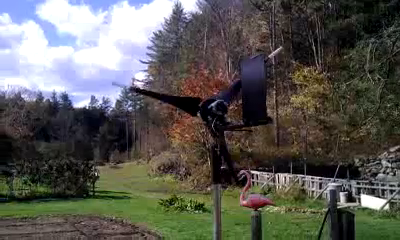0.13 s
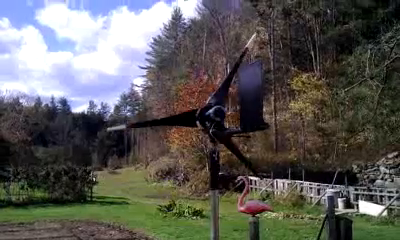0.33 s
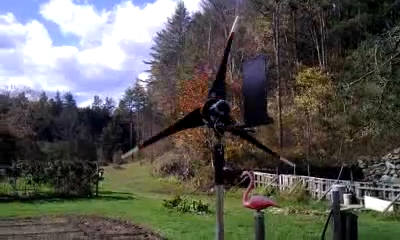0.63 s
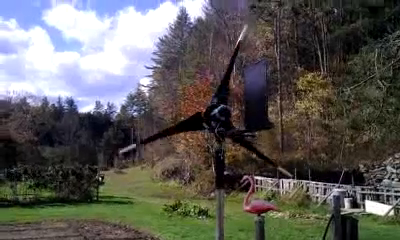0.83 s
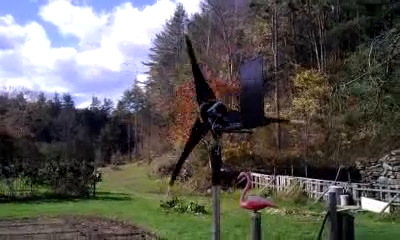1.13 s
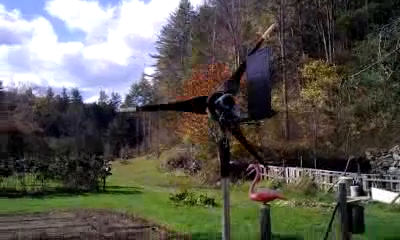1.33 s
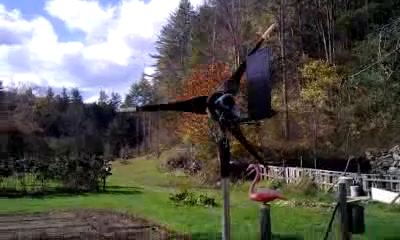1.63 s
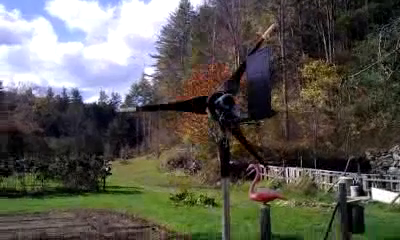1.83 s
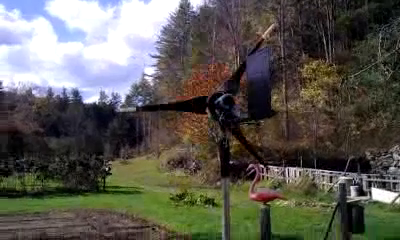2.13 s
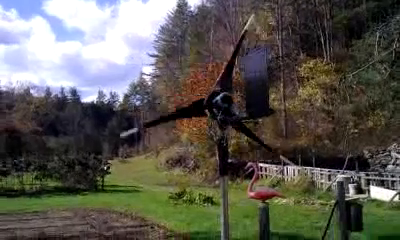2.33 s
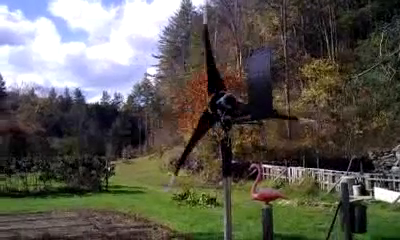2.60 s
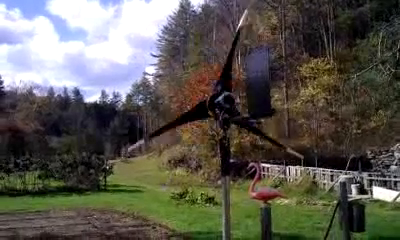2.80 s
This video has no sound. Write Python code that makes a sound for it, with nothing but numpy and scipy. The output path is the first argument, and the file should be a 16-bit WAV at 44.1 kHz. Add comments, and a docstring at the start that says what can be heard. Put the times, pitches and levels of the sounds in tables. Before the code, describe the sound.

Gusty wind buffets and overloads a small outdoor microphone, with faint hiss from spinning turbine blades

```python
"""After a moment of silence a faint hiss starts, and gusty wind at once buffets a small microphone in a yard.
The hiss is air round a little wind turbine's blades: a broad rush plus a high hiss, both shaped noise.
The wind is noise from large swirls and small eddies that follows the gusts, plus short sharp buffets.
Strong wind drives the microphone capsule to its limit, so the rumble flattens and rasps.
The blade hiss is choked whenever that happens."""
import sys
import numpy as np
from scipy import signal
from scipy.fft import rfft, irfft, next_fast_len
from scipy.io import wavfile
from scipy.ndimage import uniform_filter1d, map_coordinates

SR = 44100
rng = np.random.default_rng(int(sys.argv[2]) if len(sys.argv) > 2 else 0)


def wav_out(sig):
    """Save sig, one row per channel (or a flat mono array), as 16-bit PCM at SR to the path in sys.argv[1]."""
    wavfile.write(sys.argv[1], SR, np.round(np.clip(np.atleast_2d(sig).T, -1, 1) * 32767).astype(np.int16))


N = 130536
TIME = np.arange(N) / SR  # seconds

# Loudness of the blade sound, before BLADE_DB and the random drops: t/s, level/dB
HISS_LEVEL = [(0.06, -55.5), (0.09, -51), (0.28, -65.5), (0.33, -61), (0.35, -69.5), (0.45, -59.5),
              (0.5, -69.5), (0.54, -60.5), (0.57, -71.5), (0.6, -58.5), (1.0, -65), (1.3, -61), (1.33, -65),
              (1.44, -60.5), (1.53, -63), (1.73, -58), (1.77, -68), (1.92, -60), (1.99, -68.5), (2.36, -63),
              (2.39, -70), (2.51, -61.5), (2.6, -64.5), (2.76, -57.5), (2.84, -65.5), (2.95, -62)]
# Colour of the broad rush of air round the rotor: f/Hz, level/dB (per Hz)
RUSH_COLOUR = [(100, -1.5), (500, -7.5), (1000, 3), (1800, 1.5), (2700, -7), (4500, -5), (7000, -9.5),
               (10000, -31.5)]
# Colour of the high hiss off the blades: f/Hz, level/dB (per Hz)
BLADE_COLOUR = [(1500, -27.5), (3500, -8), (4700, -10.5), (6200, -3.5), (7500, 0), (8500, -4.5),
                (9700, -11), (10400, -31)]
# Gusts, with strength before GUST_GROWS: t/s, strength/dB, weight of the small eddies/dB
GUST_STRENGTH = [(0.09, -35.5, -11), (0.14, -36, -11.5), (0.22, -36.5, -14.5), (0.39, -33.0, -5),
                 (0.43, -36.5, -11), (0.552, -34.5, -11), (0.579, -44.5, -9), (0.61, -33, -14),
                 (0.701, -37, -11.5), (0.83, -32.5, -11), (0.921, -37.5, -4), (1.01, -29.0, -8.5),
                 (1.08, -34.0, -8.0), (1.21, -30, -8.5), (1.256, -28.0, -12.5), (1.29, -37.0, -2.5),
                 (1.39, -27, -8), (1.45, -35.5, -5.5), (1.6, -31, -8), (1.66, -28.5, -6.5),
                 (1.71, -27.0, -5.5), (1.769, -34.5, -5), (1.86, -28.5, -5), (1.93, -32, -5.5),
                 (2.02, -37.5, -0.5), (2.085, -30, -7.5), (2.115, -42, -4), (2.2, -29, -9.5),
                 (2.28, -30.5, -3.5), (2.368, -35.5, -6.5), (2.52, -30, -4), (2.651, -31.0, -7.5),
                 (2.73, -29, -7), (2.789, -26.5, -9.5), (2.85, -36.5, -5.5), (2.91, -29, -4.5),
                 (2.95, -28.5, -12)]
# Colour of the large swirls: f/Hz, level/dB (per Hz)
SWIRL_COLOUR = [(15, -6.5), (30, 1.5), (60, 2.5), (110, 3), (165, 4), (300, -5.5), (450, -24.5),
                (800, -35.5), (2000, -72)]
# Colour of the small eddies: f/Hz, level/dB (per Hz)
EDDY_COLOUR = [(60, -21), (200, 0), (380, 2.5), (550, -5), (900, -19), (1600, -26), (3000, -37.5),
               (6000, -63.5)]
# Sharp buffets that strike the capsule, before SLAP_DB: t/s, level/dB
BUFFET_HITS = [(0.083, -43), (0.213, -42.5), (0.234, -47), (0.271, -45.5), (0.344, -47), (0.372, -42.5),
               (0.398, -41), (0.475, -42.5), (0.498, -47), (0.533, -48.5), (0.561, -45), (0.838, -41.5),
               (0.935, -42.5), (0.973, -42.5), (1.01, -36), (1.029, -37.5), (1.05, -44.5), (1.078, -42.0),
               (1.13, -40.0), (1.162, -37.5), (1.184, -45), (1.247, -31.5), (1.341, -39), (1.392, -37),
               (1.508, -41.5), (1.556, -40), (1.612, -36.5), (1.66, -34), (1.677, -40.5), (1.693, -31.5),
               (1.719, -35.5), (1.749, -44), (1.829, -42.5), (1.863, -42), (1.896, -42.5), (1.913, -39.5),
               (1.987, -44), (2.089, -36.5), (2.21, -39.5), (2.241, -40.0), (2.277, -34), (2.316, -35),
               (2.336, -42), (2.394, -45.5), (2.408, -40), (2.471, -42.5), (2.495, -40.5), (2.516, -36.0),
               (2.55, -37.5), (2.57, -43.5), (2.602, -35), (2.64, -45.5), (2.688, -43), (2.711, -40.5),
               (2.729, -31.5), (2.746, -34.5), (2.78, -39.5), (2.799, -35.0), (2.837, -37), (2.888, -38.5),
               (2.908, -41), (2.948, -35.0)]
# Colour of a buffet: f/Hz, level/dB (per Hz)
SLAP_COLOUR = [(60, -15.5), (200, 2), (380, 4.5), (600, -6.5), (900, -21.5), (1600, -25.5), (3000, -36),
               (6000, -76.5)]
# Level at which the rumble flattens: t/s, level/dB
CEILING_LEVEL = [(.1, -33.5), (.8, -31), (1.02, -30.5), (1.16, -32.5), (1.255, -26.5), (1.31, -30.5),
                 (1.4, -32), (1.56, -30.5), (1.69, -27), (1.77, -28.5), (1.9, -29), (2.05, -28.5),
                 (2.27, -29.5), (2.33, -32), (2.53, -26.5), (2.62, -32), (2.75, -26), (2.85, -31.5),
                 (2.95, -27)]

HISS_START_S, WIND_START_S, FADE_S = 0.0557, 0.0688, 0.0066
BLADE_DB, RUSH_DB = 1.5, 1  # lift of all the blade sound; extra lift of the rush
HISS_CHOKE = 0.55  # share of the hiss lost at the capsule's limit
LEVEL_DROP_DB = 3.5  # depth of random brief drops in the level of all the hiss, per unit of wobble
# depth of random brief drops in the high hiss, per unit of wobble; highest wobble allowed
TREBLE_DROP_DB, TREBLE_DROP_TOP = 9, 0.31
GUST_GROWS, CALM_DB = 1.47, -29  # dB of pressure for each dB of gust away from the calm level
SWIRL_FLUTTER_DB, EDDY_FLUTTER_DB = 2, 3.5  # per unit of wobble
BUFFET_RISE_S, BUFFET_FALL_S = 0.0024, 0.0042  # widths of the two halves of a bell shape
SLAP_DB = 11.5  # lift of all the buffets
KNEE = 6.9  # hardness of the flattening, no unit
LOW_CUT_HZ, TOP_HZ = 61, 10300


def amp(db):
    """Turn decibels into a gain."""
    return 10 ** (np.asarray(db) / 20)


def unit(x):
    """Scale a sound to an average (rms) strength of 1."""
    return x / np.sqrt(np.mean(x ** 2) + 1e-20)


def curve(rows):
    """Join (time, value) rows with straight lines, one value per sample."""
    return np.interp(TIME, *np.transpose(rows))


def wobble(rate):
    """A smooth curve through random points, rate points a second, with a spread of about 1."""
    return map_coordinates(rng.standard_normal(2048), [TIME * rate], mode="wrap")


def filtered(x, response):
    """Multiply each frequency in x by a gain, which may be complex."""
    size = next_fast_len(N + 8192)  # spare room keeps the end from wrapping onto the start
    spectrum = rfft(x, size)
    return irfft(spectrum * response(np.fft.rfftfreq(size, 1 / SR)), size)[:N]


def noise(colour):
    """Random noise of rms 1, coloured by a table of frequencies and levels."""
    f, db = np.transpose(colour)

    def response(hz):
        return amp(np.interp(np.log(hz + 1), np.log(f + 1), db))

    return unit(filtered(rng.standard_normal(N), response))


def fade_in(start_s):
    """A quick straight rise out of silence."""
    return np.clip((TIME - start_s) / FADE_S, 0, 1)


def blade_hiss(swing):
    """Air rushes and hisses round the blades; a capsule near its limit has less room left for it."""
    free = 1 - HISS_CHOKE * uniform_filter1d(swing ** 2, size=90)
    level_drops_db = -LEVEL_DROP_DB * np.maximum(wobble(rate=110) - .5, 0)
    # random brief drops in the high hiss, deeper while the rumble is strong
    rumble_strength = np.sqrt(np.abs(uniform_filter1d(swing ** 2, size=2000)))
    treble_drops_db = TREBLE_DROP_DB * rumble_strength * np.minimum(wobble(rate=110), TREBLE_DROP_TOP)
    rush = amp(RUSH_DB) * noise(RUSH_COLOUR)
    high_hiss = amp(treble_drops_db) * noise(BLADE_COLOUR)
    level = amp(curve(HISS_LEVEL) + BLADE_DB + level_drops_db)
    return (rush + high_hiss) * free * level * fade_in(HISS_START_S)


def turbulence():
    """Large swirls and small eddies press on the capsule, both rising and falling with the gusts."""
    s, strength, eddy_weight = np.transpose(GUST_STRENGTH)
    gust_db = CALM_DB + GUST_GROWS * (np.interp(TIME, s, strength) - CALM_DB)
    swirl = noise(SWIRL_COLOUR) * amp(SWIRL_FLUTTER_DB * wobble(rate=60))
    eddy_db = np.interp(TIME, s, eddy_weight) + EDDY_FLUTTER_DB * wobble(rate=110)
    eddies = noise(EDDY_COLOUR) * amp(eddy_db)
    return (swirl + eddies) * amp(gust_db) * fade_in(WIND_START_S)


def buffets():
    """Each buffet shoves the capsule to and fro for a few milliseconds, evenly but at a wandering rate."""
    envelope = np.zeros(N)
    for s, db in BUFFET_HITS:
        t = TIME - s
        distance = np.maximum(-t / BUFFET_RISE_S, t / BUFFET_FALL_S)
        envelope += amp(db) * np.exp(-distance ** 2 / 2)
    shove = signal.hilbert(noise(SLAP_COLOUR))
    # dividing by its own strength evens out the noise
    even_shove = unit(shove.real / (np.abs(shove) + .5))
    return even_shove * envelope * amp(SLAP_DB)


def saturate(pressure):
    """The capsule follows small pressures, but its swing flattens towards +-1 under large ones."""
    return pressure / (1 + np.abs(pressure) ** KNEE) ** (1 / KNEE)


def scene():
    """Wind overloads the capsule, with the turbine's hiss behind it."""
    ceiling = amp(curve(CEILING_LEVEL))
    swing = saturate((turbulence() + buffets()) / ceiling)
    rumble = ceiling * swing
    return (blade_hiss(swing) + rumble)[None]


def record(dry):
    """The recorder weakens the deepest bass and removes everything from its top frequency up."""
    def response(hz):
        bass_cut = 1j * hz / (LOW_CUT_HZ + 1j * hz)
        return bass_cut * (hz < TOP_HZ)

    return filtered(dry[0], response)[None]


dry = scene()
out = record(dry)
wav_out(out)
```